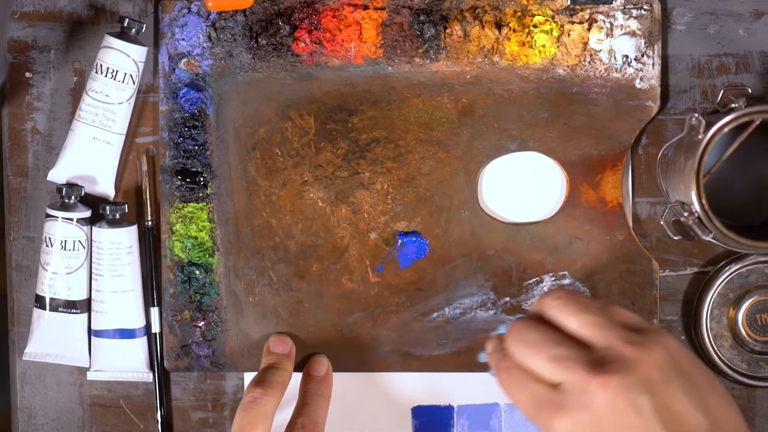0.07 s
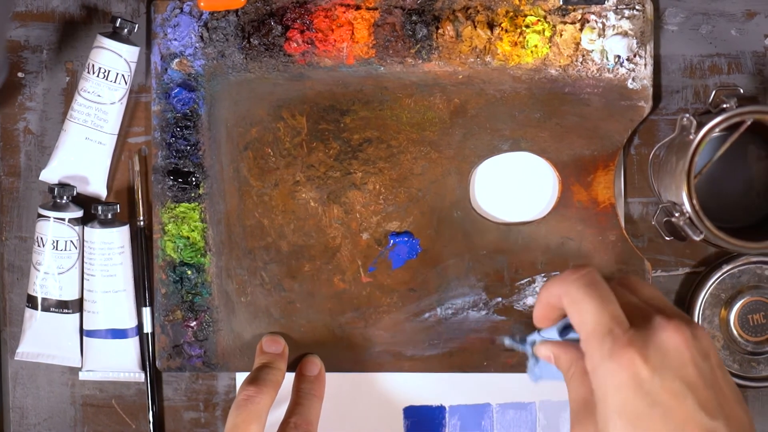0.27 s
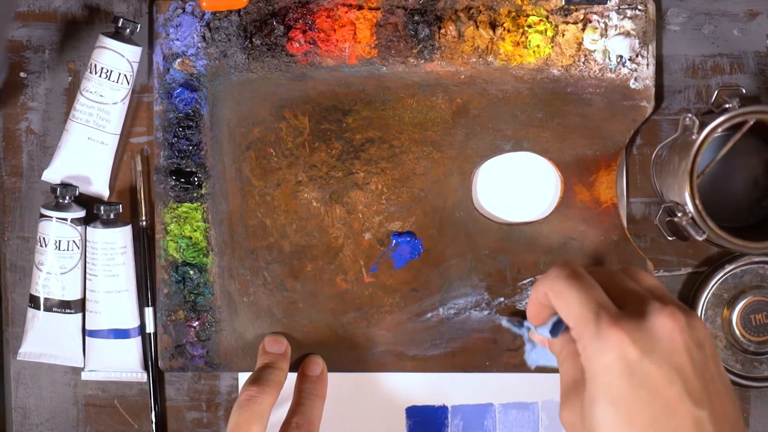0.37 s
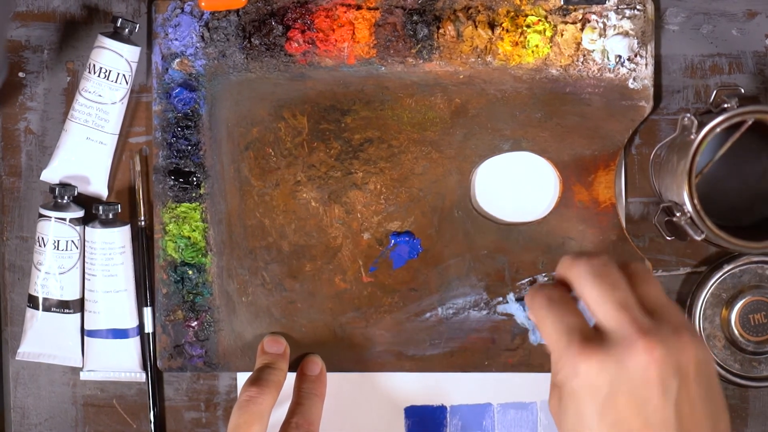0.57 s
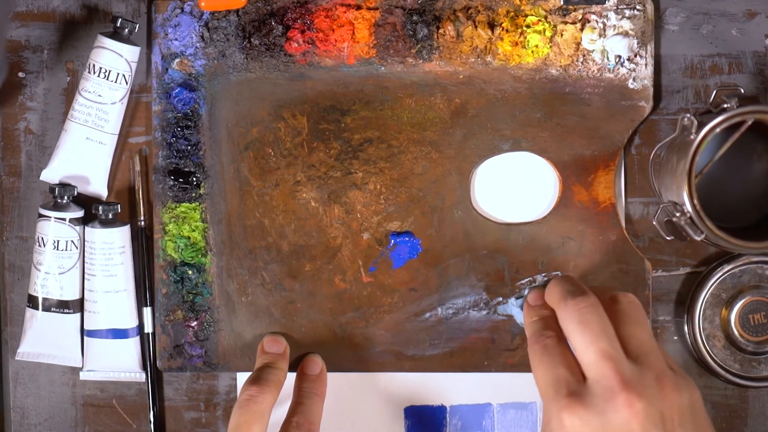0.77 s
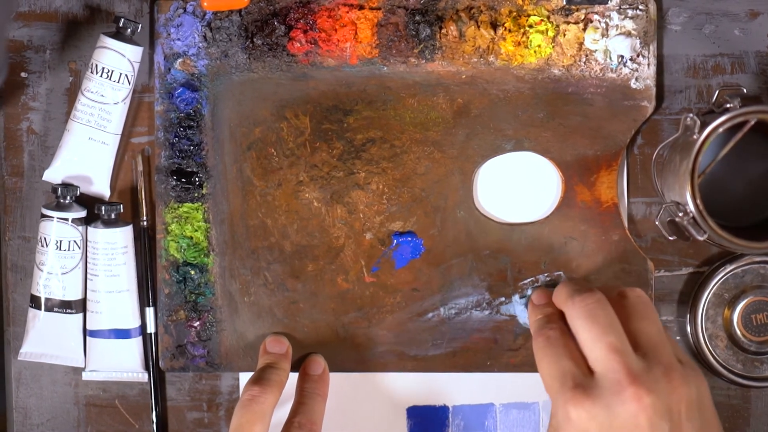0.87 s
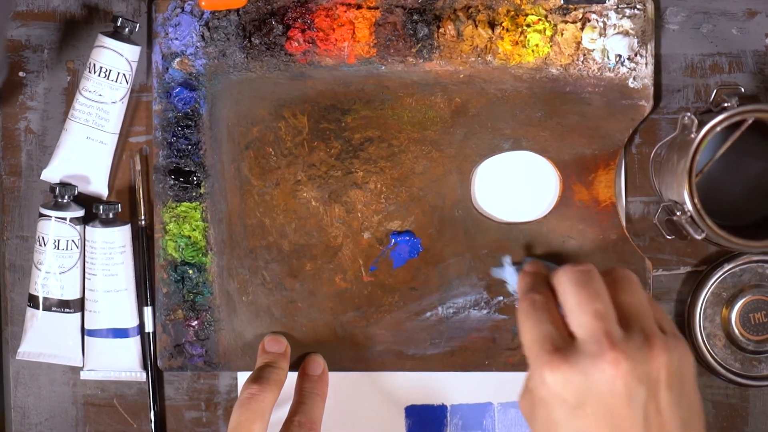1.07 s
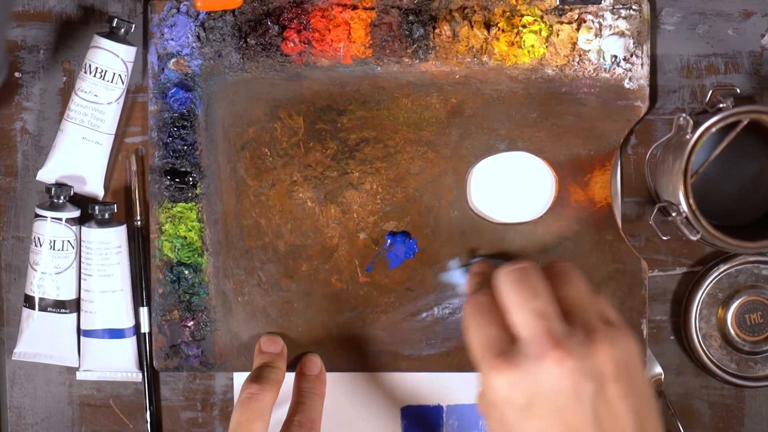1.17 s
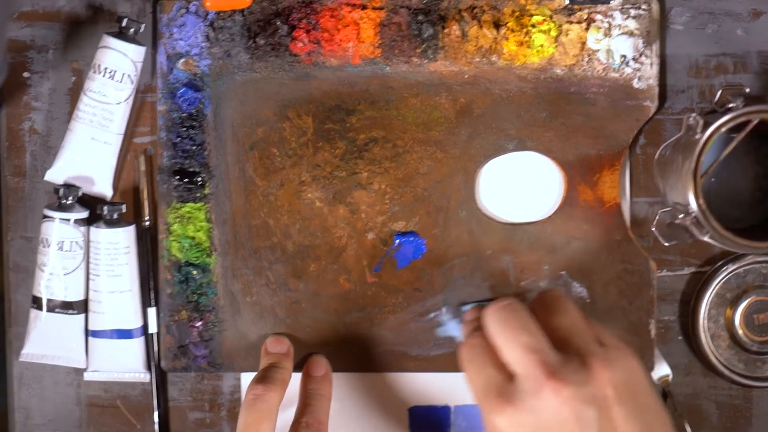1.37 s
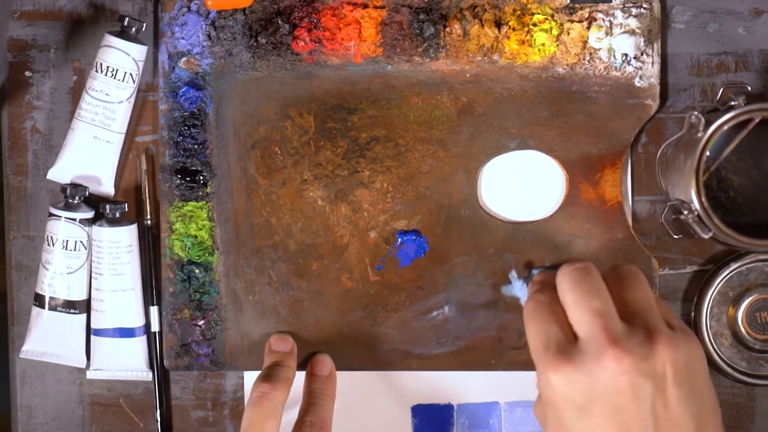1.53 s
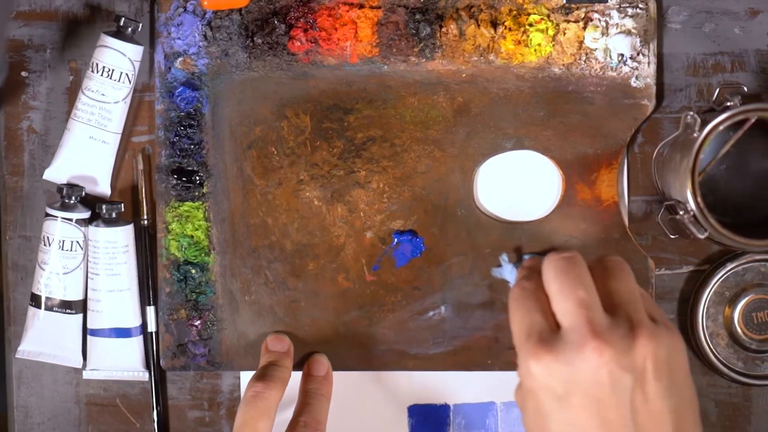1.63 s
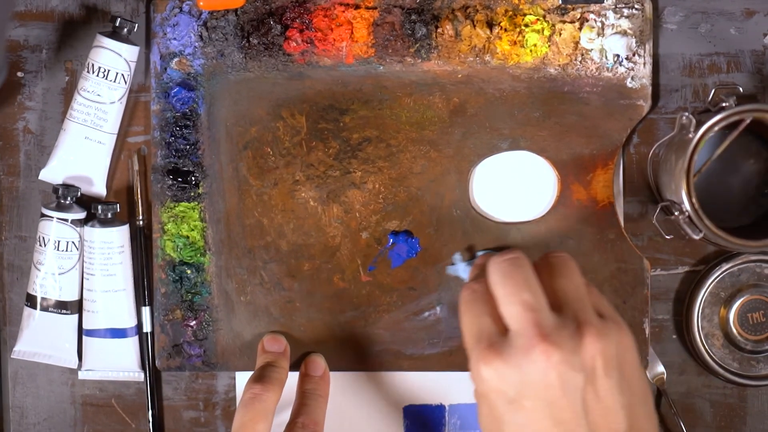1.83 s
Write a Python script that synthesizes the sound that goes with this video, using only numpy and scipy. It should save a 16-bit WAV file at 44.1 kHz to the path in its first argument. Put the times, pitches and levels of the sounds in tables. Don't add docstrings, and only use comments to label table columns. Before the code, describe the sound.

A paper towel rubs a wooden palette with a soft dry hiss. At 0.22 s a sharp woody tap rings and bounces rapidly for some 40 ms. Faint scuffs and light rubbing follow, with a soft low knock near 0.85 s. A brighter stroke swells around 1.2 s; crisp scuffs, snaps and papery chirps burst at 1.46-1.72 s, then hiss rises again. Quiet small room, faint low hum, close stereo.

```python
import sys
import numpy as np
from scipy import signal
from scipy.fft import rfft, irfft
from scipy.io import wavfile
from scipy.ndimage import uniform_filter1d

SR = 44100
rng = np.random.default_rng(int(sys.argv[2]) if len(sys.argv) > 2 else 0)


def rack_gain(trim_db):
    fader = np.asarray(trim_db, float)
    return 10 ** (fader / 20)


def generate_wav(sig):
    pcm = np.round(np.clip(np.atleast_2d(sig).T, -1, 1) * 32767).astype(np.int16)
    wavfile.write(sys.argv[1], SR, pcm)


N = 83790

# [f/Hz, likeness -1..1]
TOWEL_LIKENESS = [(100, 1), (500, 0.9), (1600, 0.58), (5000, 0.34), (8000, 0.44), (15000, -0.45)]
# [f/Hz, likeness 0..1]
ROOM_LIKENESS = [(100, 0.89), (400, 1), (1000, 0.72), (2500, 0.63), (8000, 0.12)]
# [f/Hz, level/dB per Hz]
SLOW_COLOUR = [(500, -73), (1000, -3.5), (1900, -8), (3000, 0.5), (4500, -6), (8000, -11), (15800, -31)]


def evened(x):
    return x / np.sqrt(np.mean(x ** 2) + 1e-20)


def read(points, hz):
    f, value = np.transpose(points)
    return np.interp(np.log(hz + 1), np.log(f + 1), value)


def add(mix, s, sound):
    part = mix[round(s * SR):][:len(sound)]
    part += sound[:len(part)]


def drift(size):
    once = uniform_filter1d(rng.standard_normal(N), size=size)
    return evened(uniform_filter1d(once, size=size))


def fibres(colour, grain_db, same, patch_db):
    # [f/Hz, level/dB]
    sides = [(300, 0), (1000, 1), (4400, 2), (8100, -2), (12000, 2), (15000, 2.5)]
    noise = rng.standard_normal((2, N))
    slips = noise * rack_gain(grain_db * np.minimum(rng.exponential(1, N), 4))
    z = signal.stft(slips, SR, nperseg=256)[2]

    patches = rng.standard_normal(z[0].T.shape).T
    patches = uniform_filter1d(patches, size=3, axis=0)
    patches = uniform_filter1d(patches, size=6, axis=1)
    patchy = signal.istft(z * rack_gain(patch_db * evened(patches)), SR, nperseg=256)[1][:, :N]

    a, b = rfft(patchy)
    hz = np.fft.rfftfreq(N, 1 / SR)
    likeness = np.clip(read(same, hz), -1, 1)
    tilt = rack_gain(read(sides, hz) / 2)
    left = a * tilt
    right = (likeness * a + np.sqrt(1 - likeness ** 2) * b) / tilt
    return evened(irfft(np.array([left, right]) * rack_gain(read(colour, hz)), N))


def ring(hz, db, t60, rise, lag=0):
    t = np.maximum(np.arange(SR // 4) / SR - lag, 0)
    return rack_gain(db - 60 * t / t60) * np.minimum(t / rise, 1) * np.sin(2 * np.pi * hz * t)


def wipe():
    # [t/s, level/dB]
    stroke = [(0, -54), (.158, -50), (.195, -51.5), (.216, -57), (.39, -67), (.46, -63), (.66, -62),
              (.756, -56), (.83, -64), (.956, -66.5), (1.004, -60), (1.116, -52.5), (1.183, -46),
              (1.26, -46), (1.332, -55.5), (1.45, -50), (1.812, -55), (1.845, -47.5)]
    # [f/Hz, level/dB per Hz]
    plain_colour = [(600, -64), (2200, -21.5), (2800, -6.5), (4200, -1.5), (5500, -3.5), (8000, -11.5),
                    (15800, -17)]
    fast_colour = [(2500, -40), (5000, -3), (7200, -3.5), (9000, -6.5), (15800, -9.5)]
    # [f/Hz, width/Hz, level/dB]
    hum_modes = [(1850, 38, -13), (3970, 810, -10), (5050, 430, -20)]
    grain_db, patch_db, flutter_db = 2.3, 2, 1
    slow_db, shine_db, hum_db = -57.5, -48.5, -48.5
    slow_follow, shine_follow, hum_follow = 0.33, 1.6, 0.8
    shine_lag_s = 0.019

    t = np.arange(N) / SR
    times_s, speeds_db = np.transpose(stroke)
    level_db = np.interp(t, times_s, speeds_db) + flutter_db * drift(500)
    late_db = np.interp(t - shine_lag_s, times_s, speeds_db)

    hiss = fibres(plain_colour, grain_db, TOWEL_LIKENESS, patch_db) * rack_gain(level_db)
    raw = fibres([(100, 0), (9000, 0)], 1.5, TOWEL_LIKENESS, patch_db)
    slow = fibres(SLOW_COLOUR, grain_db, TOWEL_LIKENESS, patch_db)
    slow = slow * rack_gain(slow_db + slow_follow * (level_db + 50))
    shine = fibres(fast_colour, grain_db, TOWEL_LIKENESS, patch_db)
    shine = shine * rack_gain(shine_db + shine_follow * (late_db + 49.5))
    hum = np.zeros((2, N))
    for hz, width_hz, db in hum_modes:
        b, a = signal.iirpeak(hz, hz / width_hz, SR)
        hum += rack_gain(db) * evened(signal.lfilter(b, a, raw))
    return hiss + slow + shine + hum * rack_gain(hum_db + hum_follow * (level_db + 43.0))


def scuffs():
    # [t/s, peak level/dB, rise/s, t60/s, bright share 0..1]
    catches = [(.33, -50.5, 0.0095, 0.031, 0.2), (0.474, -46, 0.01, 0.13, 0.16),
               (.495, -46.5, 0.016, 0.069, 0.06), (.582, -54.5, 0.012, 0.056, 0.3),
               (.725, -53, 0.0096, 0.036, 0), (.845, -51.5, 0.0026, 0.25, 0), (.993, -51, 0.0057, 1, 0),
               (1.028, -64, 0.004, 0.34, 0.1), (1.4595, -24.5, 0.0017, 0.12, 0.89),
               (1.4882, -29, 0.0014, 0.13, 0.7), (1.494, -24.5, 0.0083, 0.1, 1),
               (1.527, -36.5, 0.0041, 0.13, 0.26), (1.547, -34, 0.01, 0.12, 0.5),
               (1.586, -38, 0.003, 0.25, 0.2), (1.5926, -38.5, 0.00063, 0.12, 0.43),
               (1.64, -24.5, 0.0015, 0.092, 1), (1.643, -33.5, 0.00075, 0.045, 0.9),
               (1.653, -39, 0.0095, 0.04, 0.55), (1.662, -47, 0.0075, 0.039, 0.6),
               (1.711, -46, 0.0017, 0.077, 0.5), (1.716, -38, 0.0038, 0.053, 0.4),
               (1.761, -48, 0.0025, 0.086, 0.92)]
    # [f/Hz, level/dB per Hz]
    dull_colour = [(180, -26), (300, -16.5), (1450, -10), (2020, -8), (2470, -9), (6040, -6), (7870, -9),
                   (15800, -17.5)]
    bright_colour = [(180, -33), (300, -10), (612, -53), (1920, -25), (3110, -25), (3600, -10.5),
                     (5000, -12), (15800, -9.5)]
    grain_db, patch_db = 1.5, 3
    light_db = -50

    t = np.arange(SR // 3) / SR
    light, dull, bright = np.zeros((3, N))
    for s, db, rise_s, t60_s, share in catches:
        fade_db = 2 * db - 120 * np.maximum(t - rise_s, 0) / t60_s
        shape = np.minimum(t / rise_s, 1) ** 2 * rack_gain(fade_db)
        share = np.clip(share, 0, 1)
        add(light if db < light_db else dull, s, (1 - share) * shape)
        add(bright, s, share * shape)
    out = np.zeros((2, N))
    for power, colour in ((dull, dull_colour), (bright, bright_colour), (light, SLOW_COLOUR)):
        out += np.sqrt(power) * fibres(colour, grain_db, TOWEL_LIKENESS, patch_db)
    return out


def snaps():
    # [t/s, level/dB, side balance/dB]
    parting = [(1.4598, -3, 2), (1.4625, 0, 2), (1.4892, -1, .4), (1.492, -1, .4), (1.4956, -1, 1.2),
               (1.5085, -2, 1.2), (1.5942, -3, 2.2), (1.5968, -7, 2.2), (1.6397, -3, 1.5), (1.642, -1, 1.5),
               (1.6438, 0, 1.5), (1.6455, 0, 1.5), (1.6595, -7, 1.5), (1.7175, -11, 2.1), (.194, -14, 0)]
    # [t/s, level/dB, f/Hz, t60/s]
    letting_go = [(1.4600, 0, 4820, .03), (1.4605, -6, 8050, .03), (1.4605, -7, 7080, .03),
                  (1.463, -6, 4350, .025), (1.4889, -2, 7300, .022), (1.4905, -5, 4850, .03),
                  (1.4905, -5, 3500, .025), (1.499, -4, 9290, .04), (1.4995, -6, 3600, .04),
                  (1.5, -5, 6900, .025), (1.503, -7, 5760, .03), (1.5942, -11, 4310, .03),
                  (1.6398, -5, 3490, .04), (1.6405, -6, 5440, .035), (1.6445, -6, 6350, .02),
                  (1.6445, -6, 3500, .03)]
    # [f/Hz, level/dB per Hz]
    snap_colour = [(1500, -30), (3000, 5.5), (6000, 11), (10000, 3), (15800, 5)]
    snap_db, snap_t60_s = -24, 0.006
    chirp_db, chirp_rise_s = -28, 0.0005

    t = np.arange(SR // 20) / SR
    burst, chirps = np.zeros((2, N)), np.zeros(N)
    for s, db, pan_db in parting:
        for side in range(2):
            level_db = snap_db + db + pan_db * (-1.5 - side)
            add(burst[side], s, rack_gain(level_db - 60 * t / snap_t60_s))
    for s, db, hz, t60_s in letting_go:
        add(chirps, s, ring(hz, chirp_db + db, t60_s, chirp_rise_s))
    both = np.array([chirps, 1.46 * np.roll(chirps, shift=2)])
    return burst * fibres(snap_colour, 0.73, TOWEL_LIKENESS, 0.86) + both


def knocks():
    # [t/s, peak level/dB, f/Hz, t60/s]
    hits = [(0.193, -26.5, 3460, 0.0041), (.2465, -25, 2245, 0.055), (.331, -42, 952, 0.041),
            (.352, -45, 1210, 0.04), (1.4605, -48.5, 980, 0.067), (1.468, -55, 800, .04),
            (1.6, -42, 1150, .03), (0.241, -36.5, 131, 0.088), (0.499, -47.5, 2465, 0.092),
            (0.477, -55, 6020, 0.047), (0.733, -51.5, 2470, 0.029), (0.846, -37.5, 383, 0.035),
            (0.845, -40, 160, 0.072), (1.453, -45.5, 155, 0.087), (1.55, -36.5, 4800, 0.079),
            (0.982, -54.5, 358, 0.13), (1.012, -52.5, 1850, 0.033), (1.027, -35.5, 334, 0.018),
            (1.097, -53, 1850, 0.059), (1.461, -37, 1857, 0.13), (1.515, -34.5, 1156, 0.027),
            (1.514, -42, 195, 0.093), (1.53, -35, 173, 0.064), (1.547, -48, 1080, 0.072),
            (1.638, -41.5, 1710, 0.038), (1.642, -46, 316, 0.063), (1.652, -52, 1169, 0.22)]
    out = np.zeros(N)
    for s, db, hz, t60_s in hits:
        rise_s = 2 / hz
        mode = ring(hz, db, t60_s, rise_s)
        upper = ring(hz * 1.045, db + 1, t60_s * 0.5, rise_s)
        lower = ring(hz * 0.94, db - 6, t60_s * 0.92, rise_s)
        add(out, s, mode + upper - lower)
    return out


def tap():
    # [t/s, level/dB, treble tilt/dB per octave]
    blows = [
        (.22262, -13.5, 0.5),
        (.2277, -16, 10),
        (.2318, -23.5, 1.5),
        (.2425, -30.5, 10.5),
        (.2470, -20.5, 7.5),
        (.2585, -24.5, 5.5),
    ]
    # [f/Hz, level/dB, t60/s]
    board = [(852.7, -14, 0.17), (348, -0.5, 0.046), (642, -2.5, 0.043), (983, 6, 0.031), (1138, -6, 0.081),
             (1310, 2.5, 0.038), (1438, -5, 0.11), (1996, -3, 0.04), (708, -15, 0.23), (2267, -1.5, 0.042),
             (2530, -0.5, 0.042), (2990, -16, 0.025), (2347, -2, 0.053), (1670, -18, 0.035)]
    # [f/Hz, level/dB]
    crack_colour = [(330, -7.5), (470, -7), (630, -12), (790, -15), (1000, -1), (2500, 0), (2950, -6),
                    (6000, -27.5)]
    rattle_colour = [(2500, -27), (3200, 2), (3700, 4.5), (6500, -3.5), (9000, -11), (12000, -9.5),
                     (15500, -30)]
    crack_db, crack_t60_s, crack_rise_s = -6, 0.053, 0.00069
    rattle_db, rattle_t60_s, rattle_rise_s = -20, 0.061, 0.0019
    mode_rise_s, right_lag_s, pan_db = 0.00039, 0.00006, -1
    low_hz, high_hz, top_modes_hz = 241, 9000, 2420

    out, t = np.zeros((2, N)), np.arange(SR // 5) / SR
    noise = fibres(crack_colour, 1.0, ROOM_LIKENESS, 0.67)
    mixes_db = rng.standard_normal((len(blows), 2, len(board)))
    chatter = fibres(rattle_colour, 0.92, ROOM_LIKENESS, 1.1)
    signs = rng.choice([-1., 1.], (len(blows), len(board)))
    signs[0] = np.sign(np.transpose(board)[0] - top_modes_hz)
    crack = rack_gain(crack_db - 60 * t / crack_t60_s) * np.minimum(t / crack_rise_s, 1)
    rattle = rack_gain(rattle_db - 60 * t / rattle_t60_s) * np.minimum(t / rattle_rise_s, 1)

    for k, (s, db, tilt_db) in enumerate(blows):
        part = slice(k * len(t), (k + 1) * len(t))
        for side in range(2):
            modes = np.zeros(len(t))
            for j, (hz, level_db, t60_s) in enumerate(board):
                mode_db = level_db + tilt_db * np.log2(hz / 3100.0) + mixes_db[k, side, j]
                mode = ring(hz, mode_db, t60_s, mode_rise_s, side * right_lag_s)
                modes += signs[k, j] * mode[:len(t)]
            blow = 0.41 * modes + crack * noise[side, part]
            blow = blow + rack_gain(tilt_db) * rattle * chatter[side, part]
            add(out[side], s, rack_gain(db - pan_db * side) * blow)
    band = signal.butter(2, [low_hz, high_hz], "band", fs=SR, output="sos")
    return signal.sosfilt(band, out)


def room(x):
    # [f/Hz, t60/s]
    decay = [(150, 0.15), (500, 0.37), (1050, 0.27), (2500, 0.2), (4000, 0.12), (10000, 0.092)]
    echoes = np.zeros((2, SR // 2))
    at = np.arange(200, SR // 2 - 20, 20)
    at = at + rng.integers(0, 20, (2, len(at)))
    np.put_along_axis(echoes, at, rng.choice([-1., 1.], at.shape), 1)
    hz, t, z = signal.stft(echoes, SR, nperseg=256)
    likeness = np.clip(read(ROOM_LIKENESS, hz), 0, 1)[:, None]
    z = np.array([z[0], likeness * z[0] + np.sqrt(1 - likeness ** 2) * z[1]])
    fade = rack_gain(-60 * t / read(decay, hz)[:, None])
    tail = signal.istft(z * fade, SR, nperseg=256)[1]
    return signal.fftconvolve(x, tail / np.linalg.norm(tail[0]), axes=1)[:, :N]


def air():
    # [f/Hz, level/dB per Hz]
    air_colour = [(30, -16), (48, 2), (90, 0), (360, -2), (1800, -7.5), (2500, -7), (4200, -27),
                  (15800, -18)]
    # [f/Hz, likeness 0..1]
    air_likeness = [(60, 0.98), (240, 0.83), (950, 0.1), (3770, 0.57), (15000, 0.054)]
    air_db, mains_db, mains_hz = -54.5, -64, 58
    waver = 1 + 0.35 * drift(1500)
    hum = waver * np.sin(2 * np.pi * mains_hz * np.arange(N) / SR)
    return rack_gain(air_db) * fibres(air_colour, 1.0, air_likeness, 1.64) + rack_gain(mains_db) * hum


def scene():
    rub_wet_db, tap_wet_db = -9, -8
    rub = wipe() + scuffs() + knocks()
    blow = tap()
    rub = rub + snaps()
    wet = room(rack_gain(rub_wet_db) * rub + rack_gain(tap_wet_db) * blow)
    return rub + blow + wet + air()


def roll_off(x):
    return signal.sosfilt(signal.butter(12, 16810, fs=SR, output="sos"), x)


def record(dry):
    low_cut_hz, edge_hz = 35, 15850
    b, a = signal.butter(2, low_cut_hz, "high", fs=SR)
    cut = signal.lfilter(b, a, dry)
    band_limit = signal.firwin(511, edge_hz, window=("kaiser", 9), fs=SR)
    mix = signal.oaconvolve(cut, band_limit[None], "same")
    return roll_off(mix)


dry = scene()
out = record(dry)
generate_wav(out)
```